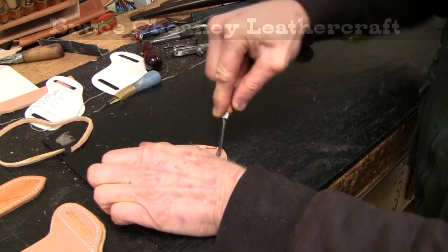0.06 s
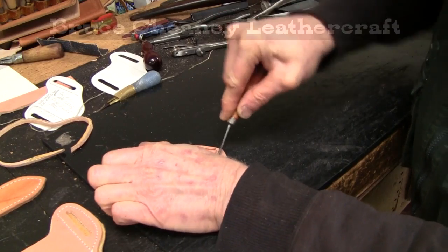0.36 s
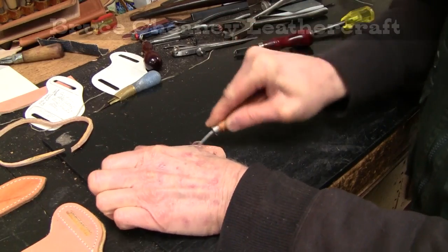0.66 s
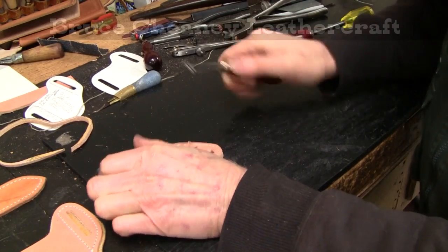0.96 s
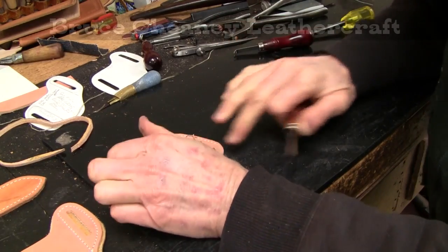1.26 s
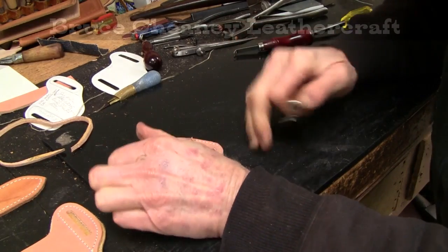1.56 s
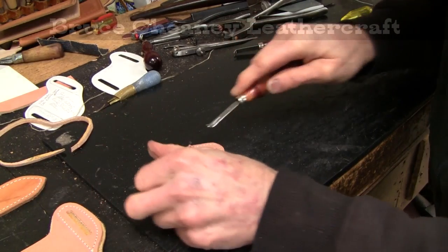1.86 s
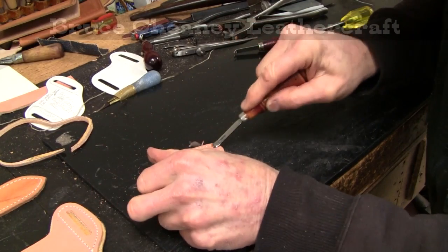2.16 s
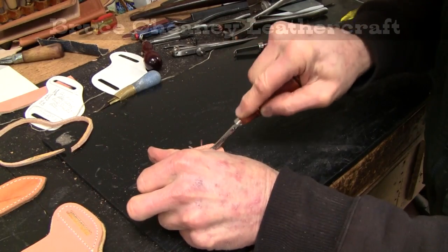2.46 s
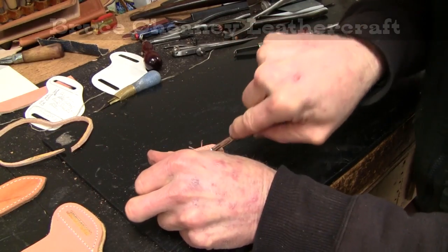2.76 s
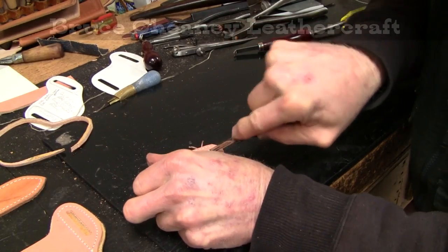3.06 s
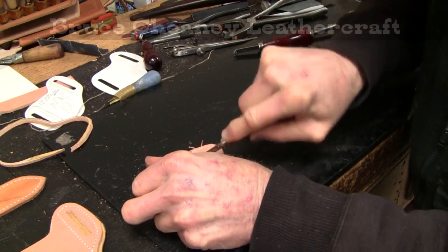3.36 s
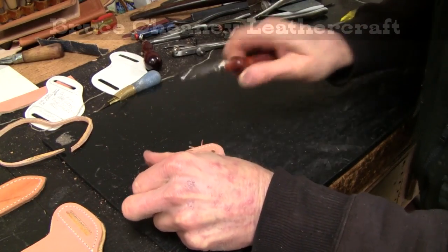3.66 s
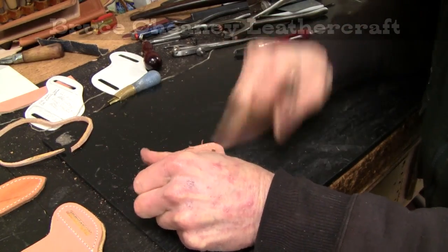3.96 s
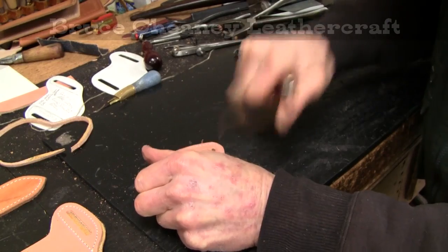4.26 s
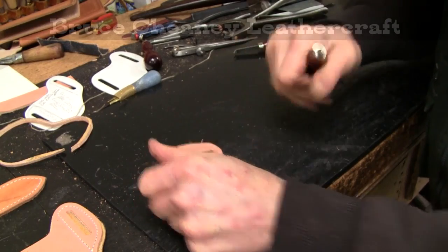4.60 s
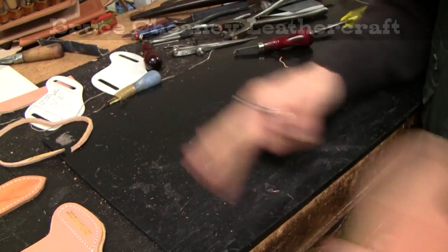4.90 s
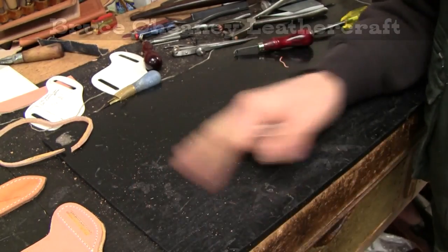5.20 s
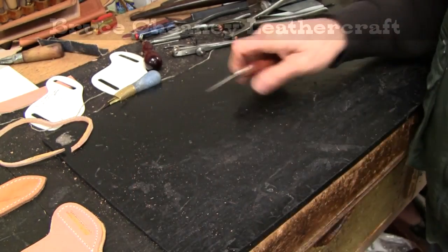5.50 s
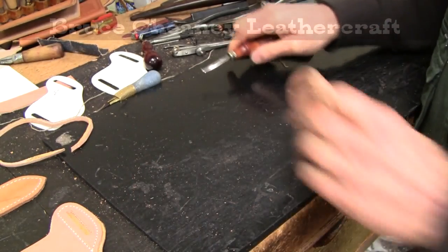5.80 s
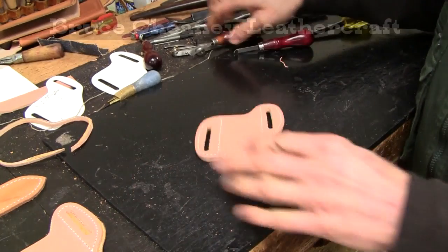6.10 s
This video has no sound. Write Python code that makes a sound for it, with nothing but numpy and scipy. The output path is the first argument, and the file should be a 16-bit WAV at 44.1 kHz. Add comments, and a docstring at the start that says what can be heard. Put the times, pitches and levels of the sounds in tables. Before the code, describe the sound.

A small edging tool shaves leather in faint, short, gritty pushes, catching and popping through fibres while sleeves rustle. A sharp steel click follows, then a hand sweeps shavings off the workbench in quick strokes among dull thuds. A tool is knocked down loudly, and another clatters briefly among its neighbours at the end. The microphone is close, in a quiet small workshop.

```python
"""Over the faint air of a small shop, an edger scrapes lightly along leather in short, gritty pushes.
The blade catches on the edge and pops through tufts of fibre; sleeves rustle as the arm swings.
A hand sweeps the shavings off the workbench in quick strokes, among dull thuds. Tools tap, click and are
knocked down, ringing bench, wooden handle and steel. It all sits close to a nearly mono microphone."""
import sys
import numpy as np
from scipy import signal
from scipy.fft import rfft, irfft, next_fast_len
from scipy.io import wavfile
from scipy.ndimage import uniform_filter1d, map_coordinates

SR = 44100
rng = np.random.default_rng(int(sys.argv[2]) if len(sys.argv) > 2 else 0)


def store_pcm(level_fs):
    """Save levels as 16-bit WAV."""
    pcm = np.round(np.clip(level_fs, -1, 1) * 32767).astype(np.int16)
    wavfile.write(sys.argv[1], SR, np.atleast_2d(pcm).T)


N = 270896

# room tone colour: freq_hz, level_db
AIR_COLOUR = [(12, -50.5), (20, -14.5), (49, -4.5), (85, -8), (119, -7.5), (167, -12.5), (276, -17),
              (386, -18), (431, -19), (570, -19.5), (866, -20.5), (1560, -23), (2000, -22.5), (2370, -22.5),
              (15800, -27.5)]
# how alike the room tone is left and right: freq_hz, correlation
AIR_LIKENESS = [(60, 0.77), (150, 0.83), (380, 0.26), (950, 0.25), (2380, 0.21), (5980, 0), (15000, -0.0)]

# strokes of blade on leather, cloth on the arm, palm on bench: full_speed_s, length_s, level_db
SCRAPES = [(.252, 0.014, -61.5), (.36, 0.091, -68), (.464, 0.0091, -61.5), (.592, .032, -57.5),
           (.638, 0.023, -47.5), (.693, 0.025, -49.5), (.735, 0.013, -63), (1.704, 0.0076, -59),
           (1.838, 0.021, -53.5), (2.64, 0.22, -66.5), (3.006, 0.0073, -58), (3.414, 0.021, -56.5),
           (3.434, 0.011, -52), (3.583, 0.0029, -52.5), (4.098, 0.0047, -56.5), (5.56, 0.074, -58.5),
           (5.68, 0.022, -57.5), (5.895, .025, -59)]
SLEEVES = [(.965, 0.065, -61.5), (1.78, 0.054, -63), (3.755, 0.039, -62.5), (4.68, 0.013, -65),
           (5.08, 0.017, -63), (5.5, 0.29, -64)]
SWEEPS = [(1.305, 0.025, -63.5), (1.58, 0.021, -53.5), (3.795, 0.042, -64.5), (4.055, 0.022, -46),
          (4.308, .005, -53), (4.333, 0.024, -47), (4.602, 0.035, -50), (5.005, 0.044, -34.5),
          (5.315, .03, -37)]
# friction colour of each of those surfaces: freq_hz, level_db
LEATHER_COLOUR = [(40, 9), (100, 7), (250, 0.5), (430, 5), (900, 1.5), (1150, -1.5), (1800, -6.5),
                  (2400, -2.5), (3500, 1), (4600, -8), (5500, -8), (7000, -14.5), (16000, -24.5)]
CLOTH_COLOUR = [(100, -32), (1100, -16), (1700, -8), (2500, -6.5), (3500, 0.5), (4400, -6.5), (5500, -8),
                (10000, -11), (16000, -23)]
PALM_COLOUR = [(50, -28), (150, -14.5), (380, -3), (650, -10), (900, -12), (1480, -5.5), (1900, -7),
               (2500, -7), (3450, -2), (4300, -5.5), (5300, -7), (6500, -8), (12000, -11.5), (16000, -11)]

# hits: start_s, peak_db, contact_ms
BLADE_CATCHES = [(.6948, -42.5, 0.34), (.714, -44, 0.53), (1.801, -44, 0.51), (3.591, -36, 0.15),
                 (3.995, -43, 0.24)]  # the blade catches on the leather's edge
BENCH_THUDS = [(1.5908, -32.5, 2.3), (1.847, -40, 9.3), (4.008, -44.5, 9.2), (4.072, -34.5, 1.85),
               (4.281, -47, 11), (4.358, -37.5, 1.34), (4.6283, -26.5, 4.6), (4.926, -44, 2.8),
               (5.457, -40.5, 6.3), (6.089, -22, 3.1)]  # dull, low thuds on the bench, from a hand or a landing tool
HANDLE_TAPS = [(1.837, -40, 0.92), (3.5818, -38, 0.48), (5.216, -35, 0.83), (5.488, -45, 1),
               (5.530, -30, 0.86), (5.609, -39, .85)]  # a handle taps in the hand or against its neighbours
STEEL_CLICKS = [(2.119, -51.5, 1.35), (2.5613, -42.5, 1.26), (3.009, -42.5, 0.48), (3.8865, -15.5, 0.2),
                (6.0866, -19.5, 0.44)]
TOOL_KNOCKS = [(4.130, -48.5, 0.54), (4.183, -48.5, 1), (4.876, -6, 0.84), (5.2823, -20.5, 0.98),
               (5.458, -36.5, 0.93), (6.0618, -18.5, 0.96), (6.123, -34, 0.98)]  # a tool is knocked down on the bench
TOOL_BOUNCES = [(6.0792, -7, 0.33), (6.0874, -9.5, 0.4)]  # a tool drops among the others
# the blade pops through a tuft of fibres: start_s, peak_db
NICKS = [(.887, -60), (2.754, -53), (2.8575, -45), (3.010, -38), (3.125, -52), (3.133, -54)]

# resonances: pitch_hz, width_hz, gain_db
BENCH_MODES = [(97, 93, -13), (205, 38, -8), (286, 175, -1), (414, 97, 5.5), (583, 160, 6)]
HANDLE_MODES = [(834, 450, -2.5), (1090, 460, -12.5), (1320, 82, 2), (1575, 330, 2), (2260, 940, 10.5),
                (3660, 1600, 8)]
STEEL_MODES = [(2340, 730, -3.5), (3100, 200, -0.5), (4070, 530, 0.5), (5640, 620, 2.5), (7900, 2200, -4.5),
               (12000, 1200, -1.5)]
FLEX_MODES = [(106.3, 70, -0.5)]  # the whole bench top gives under a weight
LEATHER_MODES = [(430, 79, 9), (566, 53, 4), (704, 57, -27)]  # the held leather's dull ring
RASP_MODES = [(1490, 100, -21), (3200, 120, 2.5), (3560, 84, 7)]  # what the sweeping hand sets ringing

# the shop's reverb tail: freq_hz, level_db, t60_s
SHOP_TAIL = [(100.1, -4.5, 0.24), (404, -9.5, 0.2), (1110, -16, 0.22), (2215, -21, 0.26),
             (3500, -14.5, 0.23), (5400, -20.5, .14), (14000, -23, 0.2)]
# early reflections off the bench and its clutter: delay_s, level_db
ECHOES = [(.0036, -19), (.0058, -19.5), (.009, -27), (.011, -26)]


def amp(db):
    """Decibels to gain."""
    return 10 ** (np.asarray(db) / 20)


def unit(x):
    """Scales to rms 1."""
    return x / np.sqrt(np.mean(x ** 2) + 1e-20)


def curve(points, hz):
    """Joins table rows by straight lines on a log-frequency axis."""
    freq_hz, value = np.transpose(points)
    return np.interp(np.log(hz + 1), np.log(freq_hz + 1), value)


def bins(size):
    """Frequencies of a spectrum of that many samples."""
    return np.fft.rfftfreq(size, 1 / SR)


def add(mix, start_s, sound):
    """Mixes a sound in from start_s on."""
    part = mix[max(round(start_s * SR), 0):][:len(sound)]
    part += sound[:len(part)]


def ring(modes, hz, order=1):
    """Response of damped resonances; a higher order leaves deeper valleys between them."""
    return sum(amp(db) * (1j * hz * width / (pitch ** 2 - hz ** 2 + 1j * hz * width)) ** order
               for pitch, width, db in modes)


def rolloff(ratio, kind, order):
    """A smooth low-pass or high-pass; ratio is frequency over corner."""
    return signal.freqs(*signal.butter(order, 1, kind, analog=True), ratio)[1]


def air(air_db=-62.5, hum_db=-70.5, hum_hz=120.6, hum_width_hz=6.6):
    """The bed: low rumble and microphone hiss, with a faint wavering hum."""
    hz = bins(N)
    mid, side, hum_noise = rfft(rng.standard_normal((3, N)))
    likeness = np.clip(curve(AIR_LIKENESS, hz), -1, 1)
    mid *= np.sqrt((1 + likeness) / 2)
    side *= np.sqrt((1 - likeness) / 2)
    bed = irfft(np.array([mid + side, mid - side]) * amp(curve(AIR_COLOUR, hz)), N)
    hum = irfft(hum_noise * ring([(hum_hz, hum_width_hz, 0)], hz, order=2), N)
    return amp(air_db) * unit(bed) + amp(hum_db) * unit(hum)


def swell(t, length_s, attack_s, release_s):
    """Speed of a stroke: it gathers, holds for its length and dies away."""
    return np.exp(-np.maximum(-t, 0) / attack_s - np.maximum(t - length_s, 0) / release_s)


def friction(strokes, colour, snags_per_s, snag_share, uneven_db, reflection, attack_share, release_s,
             bass_lag_s, usual_db, bass_per_db, treble_per_db, least_attack_s=0.001,
             gap_ms=0.55, closing=0.24, bass_hz=700, treble_hz=5000):
    """Fibres snag and let go over a fine hiss that swells with the speed of the hand."""
    out = np.zeros(N)
    snag_sizes = np.minimum(rng.exponential(1, N), 3) * rng.choice([-1, 1], N)
    snags = unit(snag_sizes * (rng.random(N) < snags_per_s / SR))
    wander = unit(signal.oaconvolve(rng.standard_normal(N), np.hanning(400), "same"))
    grit = np.sqrt(snag_share) * snags + np.sqrt(1 - snag_share) * rng.standard_normal(N)
    grit *= amp(uneven_db * wander)
    for full_speed_s, length_s, level_db in strokes:
        attack_s = least_attack_s + attack_share * length_s
        start_s = full_speed_s - 4 * attack_s
        end_s = full_speed_s + length_s + bass_lag_s + 4 * release_s
        span = np.arange(max(int(start_s * SR), 0), min(int(end_s * SR), N))
        t = span / SR - full_speed_s
        size = next_fast_len(len(span), True)
        hz = bins(size)
        # sound bounces in the narrowing gap between hand and bench: a hollow, rising colour
        delay = gap_ms / 1000 * SR * np.exp(-closing * (t / length_s - 0.5))
        hollow = grit[span] + reflection * map_coordinates(grit[span], [np.arange(len(span)) - delay])
        # the colour tilts with how much harder than usual the stroke presses
        bass = 1 / (1 + (hz / bass_hz) ** 4)
        treble = hz ** 2 / (hz ** 2 + treble_hz ** 2)
        tilt_db = (level_db - usual_db) * (bass_per_db * bass + treble_per_db * treble)
        rub = unit(irfft(rfft(hollow, size) * amp(curve(colour, hz) + tilt_db), size)[:len(span)])
        # the weight of the hand comes down late, so the bass follows the hiss
        lows = irfft(rfft(rub, size) * bass, size)[:len(span)]
        hiss = (rub - lows) * swell(t, length_s, attack_s, release_s)
        body = lows * swell(t - bass_lag_s, length_s, attack_s, release_s)
        out[span] += amp(level_db) * (hiss + body)
    return out


def scraping():
    """The edger shaves the leather in short, gritty pushes."""
    return friction(SCRAPES, LEATHER_COLOUR, snags_per_s=700, snag_share=0.41, uneven_db=2.5,
                    reflection=0.069, attack_share=0.24, release_s=0.012, bass_lag_s=0.0015,
                    usual_db=-51, bass_per_db=-0.5, treble_per_db=-0.44, least_attack_s=0.0058)


def hits(rows, bench_db, handle_db, steel_db, send_db, flex_db=-30, wood_order=5, size=8192,
         bench_cut_hz=50, handle_cut_hz=620, steel_cut_hz=1500, tip_share=0.23):
    """Each hit rings bench, wooden handle and steel; returns the direct sound and the reverb send."""
    direct, hz = np.zeros(N), bins(size)
    bench = amp(bench_db) * ring(BENCH_MODES, hz) * rolloff(hz / bench_cut_hz, "high", order=2)
    bench += amp(flex_db) * ring(FLEX_MODES, hz)
    # small parts radiate little bass
    handle = amp(handle_db) * ring(HANDLE_MODES, hz) * rolloff(hz / handle_cut_hz, "high", order=2)
    steel = amp(steel_db) * ring(STEEL_MODES, hz, order=2) * rolloff(hz / steel_cut_hz, "high", order=2)
    for start_s, peak_db, contact_ms in rows:
        # a long, soft contact cannot drive the high modes; the steel tip touches far more briefly
        top_hz = 1000 / contact_ms
        wood = (bench + handle) * rolloff(hz / top_hz, "low", order=wood_order)
        tip = steel * rolloff(hz * tip_share / top_hz, "low", order=5)
        hit = -irfft(wood + tip)
        add(direct, start_s, amp(peak_db) * hit / abs(hit).max())
    return np.array([direct, amp(send_db) * direct])


def bench_hits(touch_lead_s=0.0044, touch_db=-7, touch_softer=2.2):
    """Each kind of hit has its own blend of wood and steel; the thuds roll off more gently."""
    # a lighter, softer touch comes just ahead of each thud
    touches = [(start_s - touch_lead_s, peak_db + touch_db, contact_ms * touch_softer)
               for start_s, peak_db, contact_ms in BENCH_THUDS]
    return (hits(BLADE_CATCHES, bench_db=6.5, handle_db=-5.5, steel_db=0, send_db=11)
            + hits(BENCH_THUDS + touches, bench_db=4, handle_db=1.5, steel_db=-17.5, send_db=0.5,
                   flex_db=-1, wood_order=2)
            + hits(HANDLE_TAPS, bench_db=1.5, handle_db=11, steel_db=-5.5, send_db=8.5)
            + hits(STEEL_CLICKS, bench_db=-16.5, handle_db=-5, steel_db=5, send_db=3.5)
            + hits(TOOL_KNOCKS, bench_db=6, handle_db=9.5, steel_db=-10.5, send_db=-1, handle_cut_hz=610)
            + hits(TOOL_BOUNCES, bench_db=7, handle_db=6, steel_db=-12, send_db=1))


def nicks(size=4096, cut_hz=330, top_hz=950):
    """Each sudden give of the fibres plucks the leather: a small, dull pop."""
    out, hz = np.zeros(N), bins(size)
    band = rolloff(hz / cut_hz, "high", order=3) * rolloff(hz / top_hz, "low", order=2)
    pop = irfft(ring(LEATHER_MODES, hz) * band)
    for start_s, peak_db in NICKS:
        add(out, start_s, amp(peak_db) * pop / abs(pop).max())
    return out


def sleeves():
    """Cloth hisses softly and trails off as the arm slows."""
    return friction(SLEEVES, CLOTH_COLOUR, snags_per_s=1900, snag_share=0.12, uneven_db=2.5,
                    reflection=0.35, attack_share=0.64, release_s=0.18, bass_lag_s=0.01,
                    usual_db=-56, bass_per_db=-3, treble_per_db=0.4)


def sweeping():
    """The palm brushes the bench; the harder it presses, the more the top rasps."""
    brush = friction(SWEEPS, PALM_COLOUR, snags_per_s=9400, snag_share=0.19, uneven_db=2,
                     reflection=0.098, attack_share=0.68, release_s=0.011, bass_lag_s=0.015,
                     usual_db=-46.5, bass_per_db=0.09, treble_per_db=-0.5)
    pressure = uniform_filter1d(abs(brush), size=900)
    rasp = irfft(rfft(brush * pressure / pressure.max()) * ring(RASP_MODES, bins(N)), N)
    return brush + rasp


def shop_reverb(send, build_s=0.0017, taps_per_s=6000):
    """A few near echoes, then a short tail of sparse taps that dies at its own speed in each band."""
    size = SR // 2
    taps = rng.choice([-1., 1.], size) * (rng.random(size) < taps_per_s / SR)
    hz, t, bands = signal.stft(taps, SR, nperseg=256)
    table = np.array(SHOP_TAIL)
    level_db = curve(table[:, :2], hz)[:, None]
    t60_s = curve(table[:, [0, 2]], hz)[:, None]
    bands = bands * amp(level_db - 60 * t / t60_s) / np.sqrt(t60_s)
    tail = signal.istft(bands, SR, nperseg=256)[1][:size] * np.sqrt(np.log(1e6) / taps_per_s)
    tail *= 1 - np.exp(-(np.arange(size) / SR / build_s) ** 2)
    for delay_s, echo_db in ECHOES:
        tail[round(delay_s * SR)] += amp(echo_db)
    return signal.oaconvolve(send, tail)[:N]


def scene(rub_send_db=-3):
    """Strokes, hits and reverb sit dead centre; only the room tone has width."""
    rubs = sweeping() + nicks() + scraping() + sleeves()
    direct, send = bench_hits()
    return rubs + direct + shop_reverb(send + amp(rub_send_db) * rubs) + air()


def record(dry, top_hz=15850):
    """A steep low-pass trims the very top."""
    lowpass = signal.firwin(511, top_hz, window=("kaiser", 9), fs=SR)
    return signal.oaconvolve(dry, lowpass[None], "same")


dry = scene()
out = record(dry)
store_pcm(out)
```